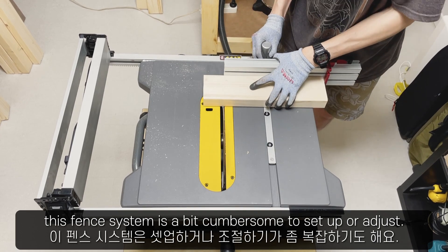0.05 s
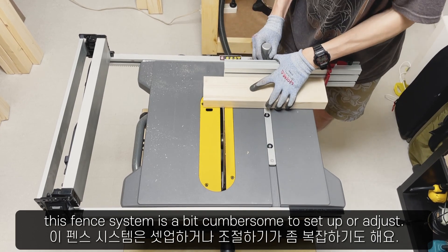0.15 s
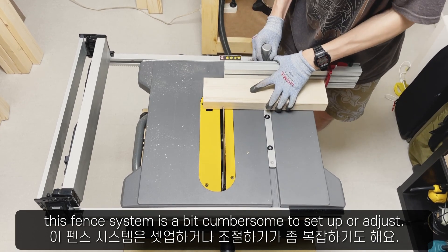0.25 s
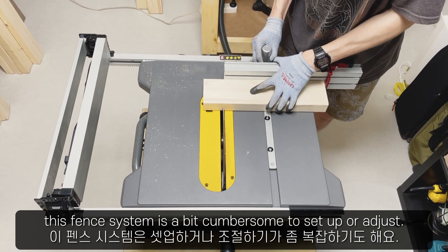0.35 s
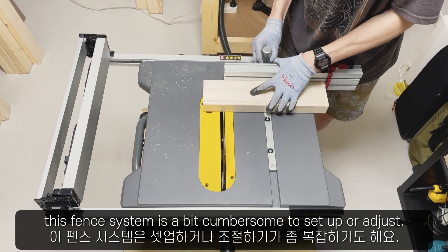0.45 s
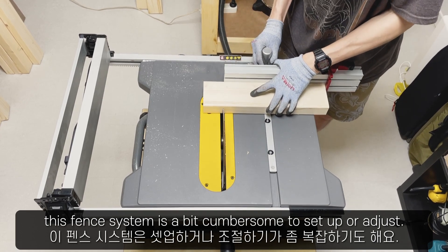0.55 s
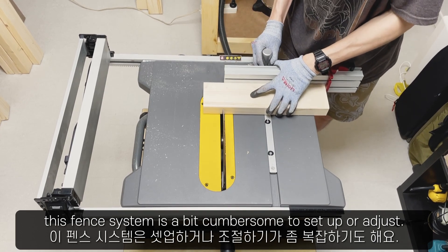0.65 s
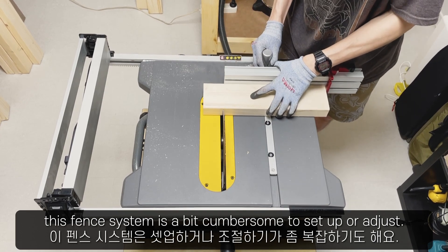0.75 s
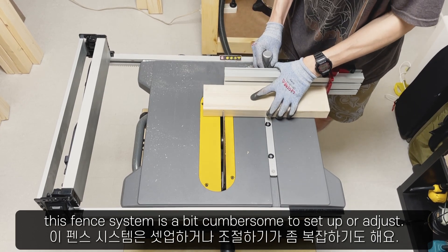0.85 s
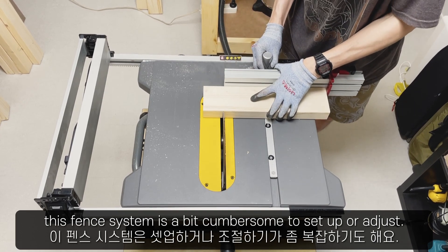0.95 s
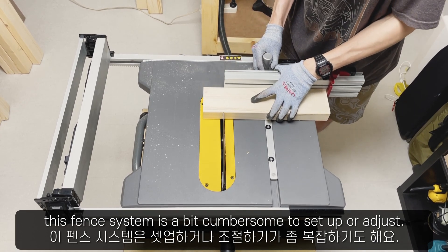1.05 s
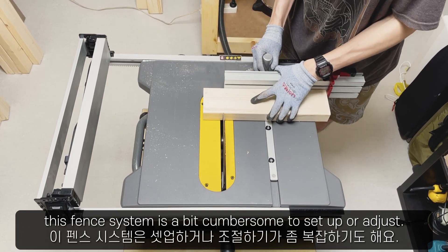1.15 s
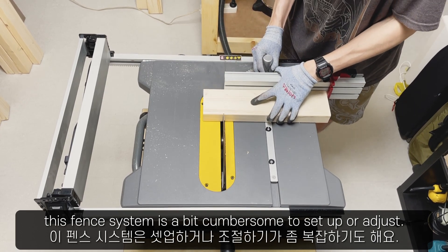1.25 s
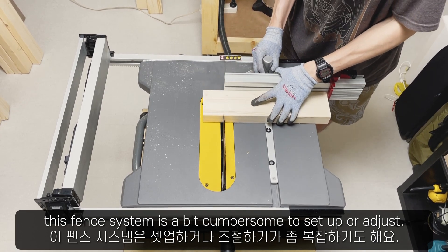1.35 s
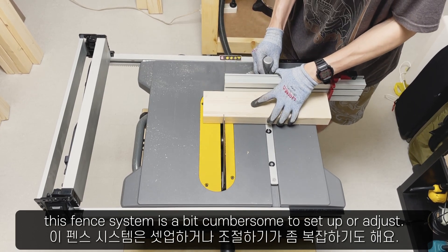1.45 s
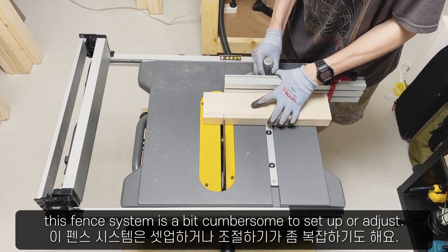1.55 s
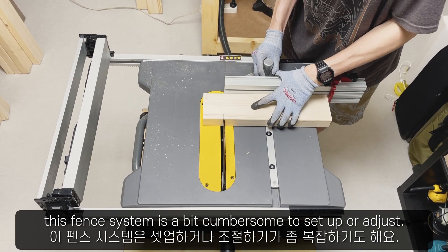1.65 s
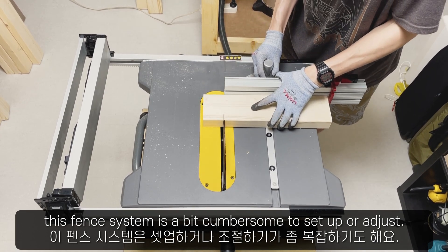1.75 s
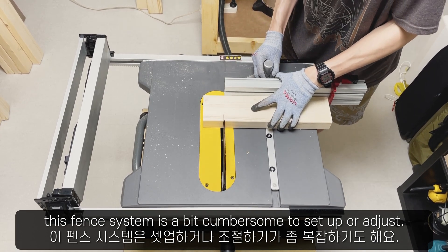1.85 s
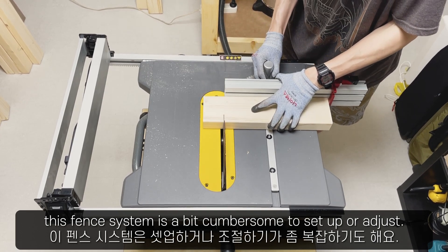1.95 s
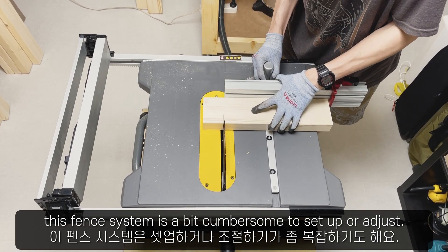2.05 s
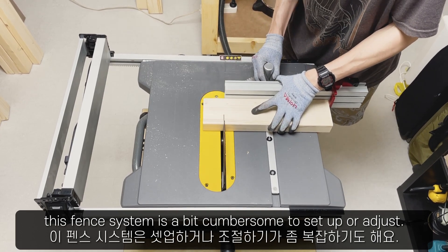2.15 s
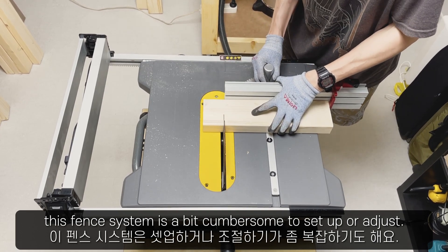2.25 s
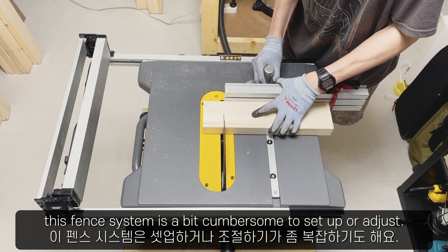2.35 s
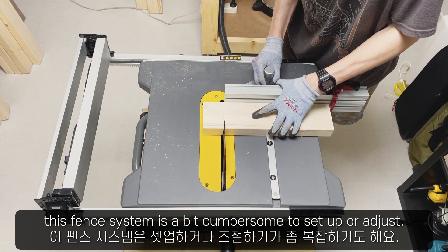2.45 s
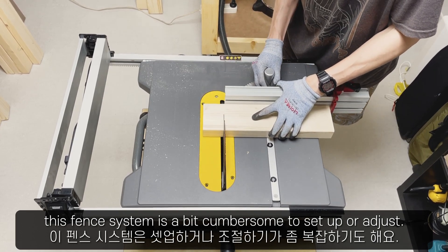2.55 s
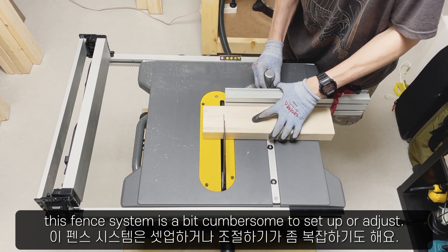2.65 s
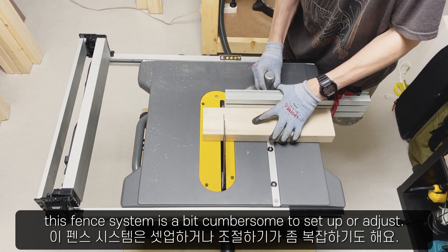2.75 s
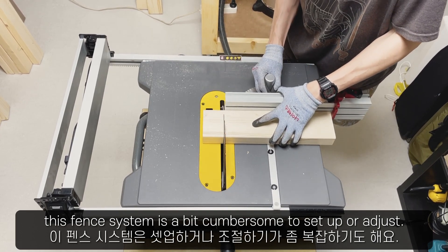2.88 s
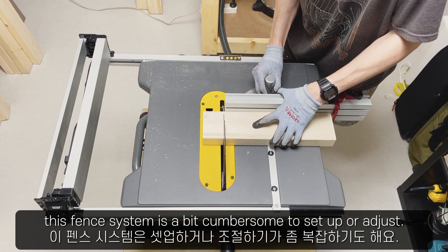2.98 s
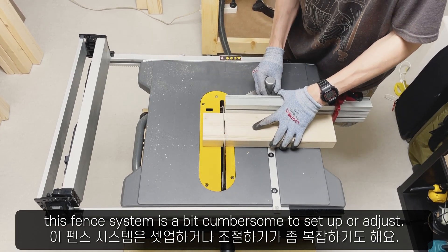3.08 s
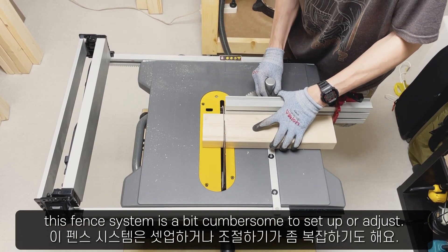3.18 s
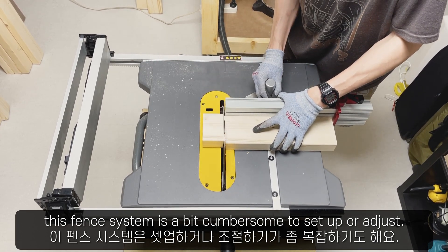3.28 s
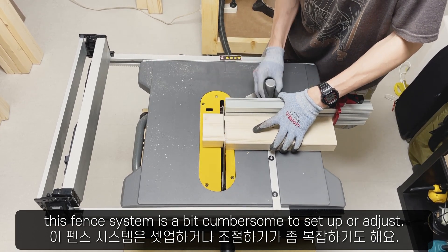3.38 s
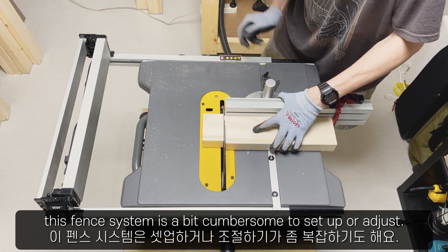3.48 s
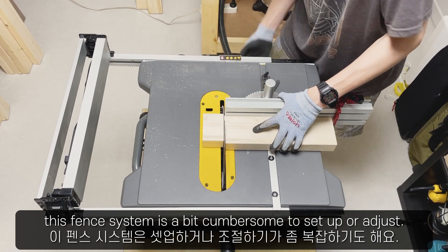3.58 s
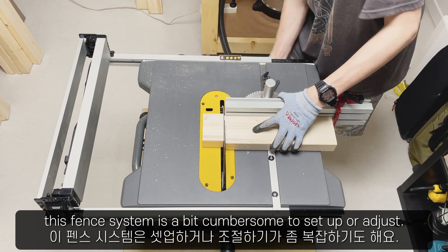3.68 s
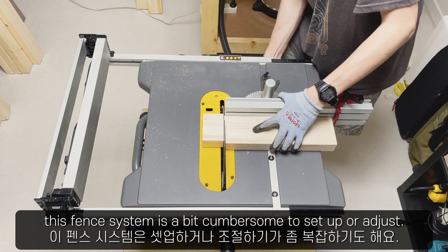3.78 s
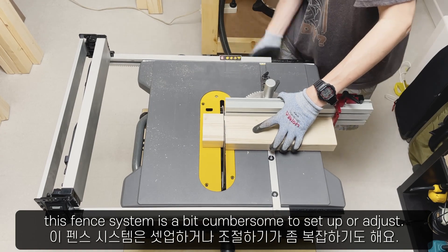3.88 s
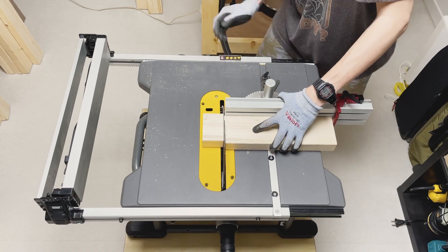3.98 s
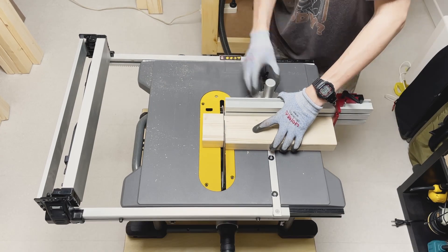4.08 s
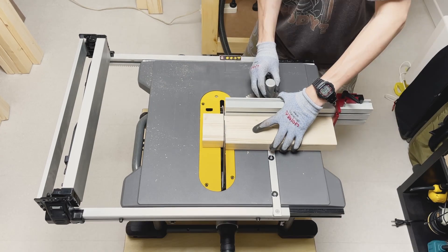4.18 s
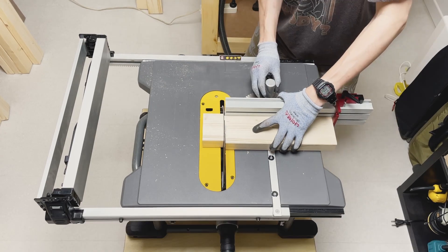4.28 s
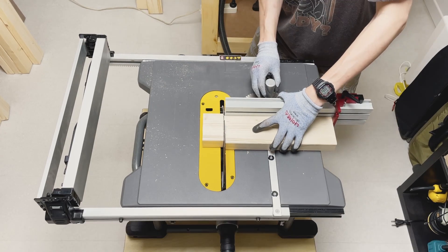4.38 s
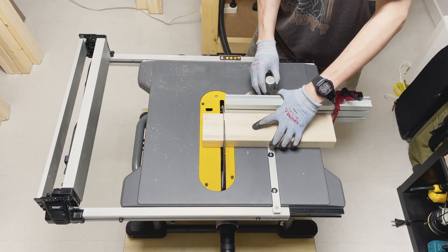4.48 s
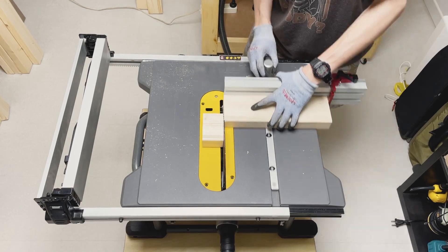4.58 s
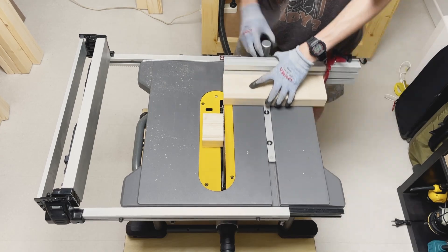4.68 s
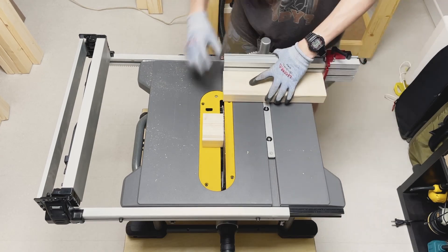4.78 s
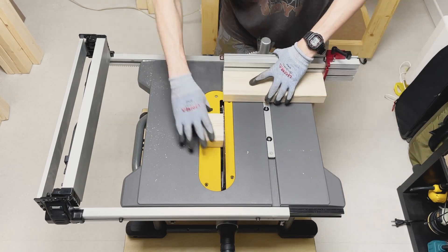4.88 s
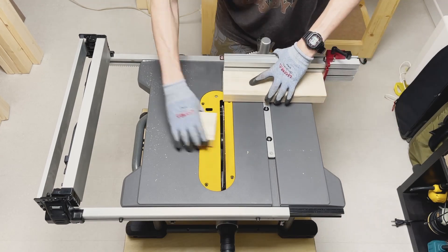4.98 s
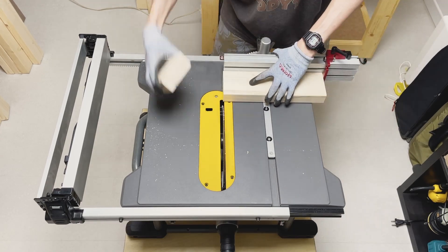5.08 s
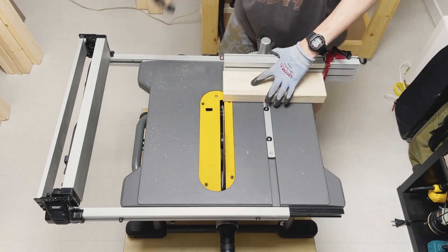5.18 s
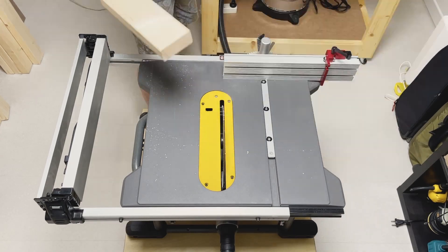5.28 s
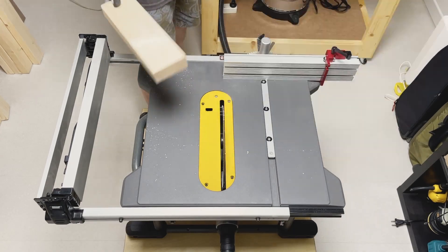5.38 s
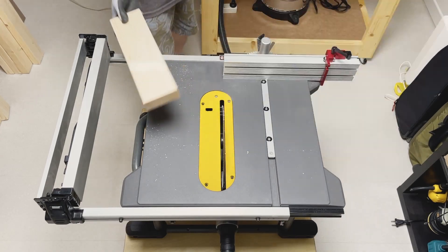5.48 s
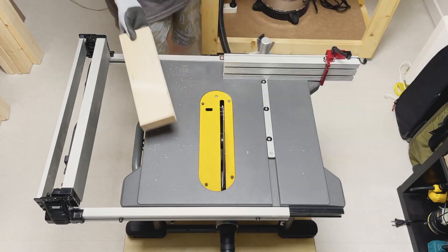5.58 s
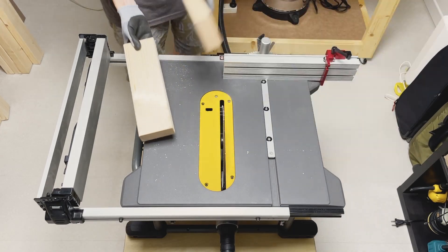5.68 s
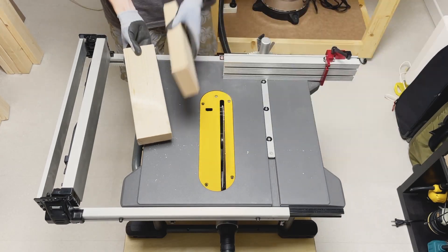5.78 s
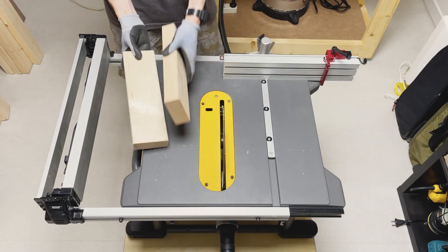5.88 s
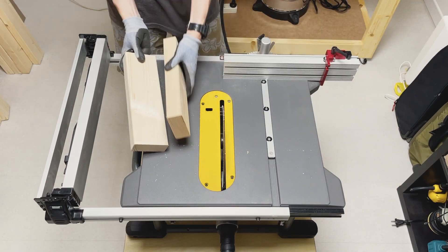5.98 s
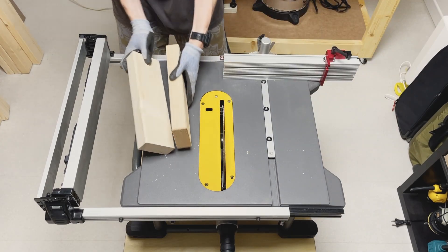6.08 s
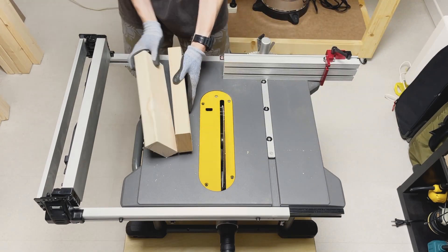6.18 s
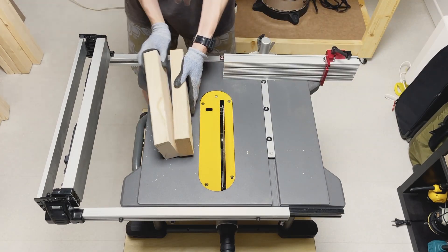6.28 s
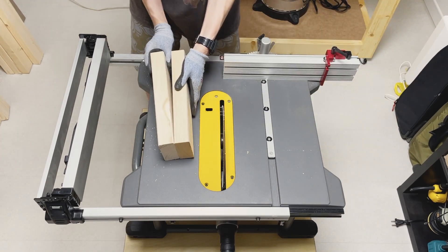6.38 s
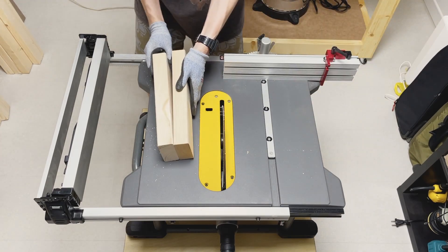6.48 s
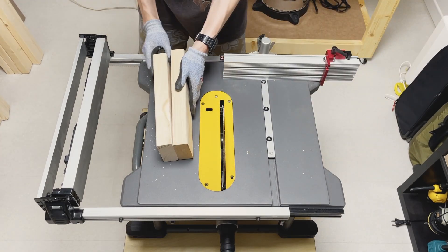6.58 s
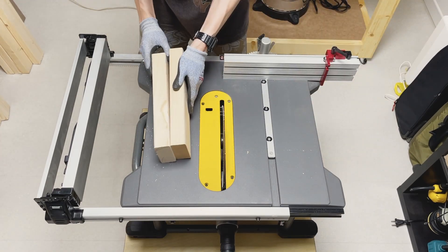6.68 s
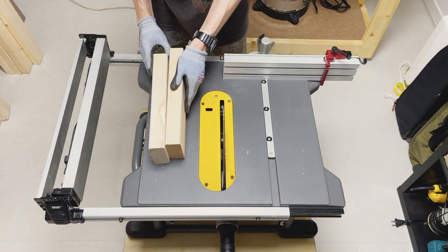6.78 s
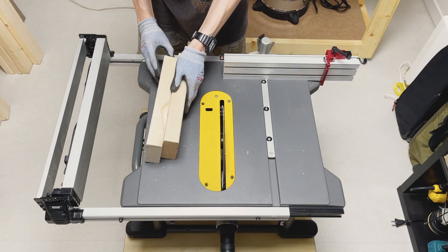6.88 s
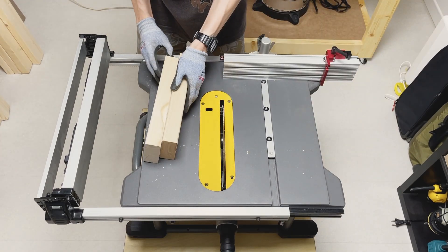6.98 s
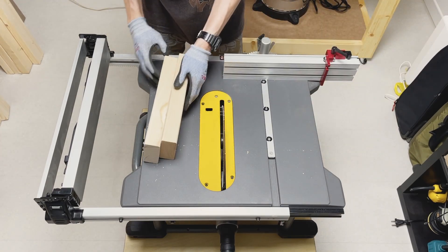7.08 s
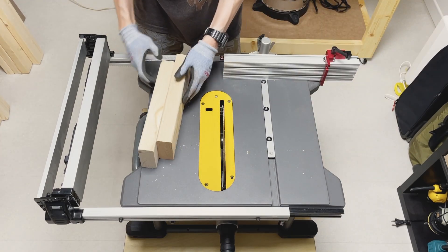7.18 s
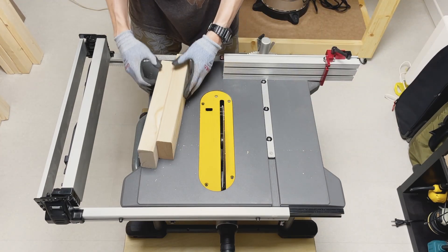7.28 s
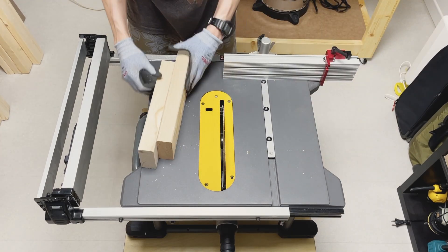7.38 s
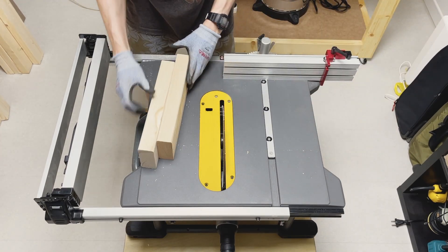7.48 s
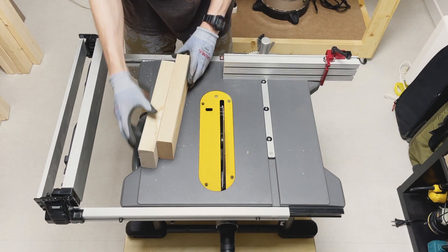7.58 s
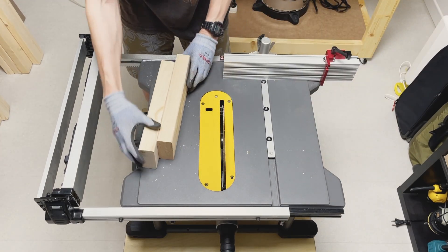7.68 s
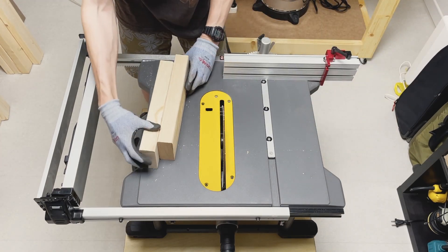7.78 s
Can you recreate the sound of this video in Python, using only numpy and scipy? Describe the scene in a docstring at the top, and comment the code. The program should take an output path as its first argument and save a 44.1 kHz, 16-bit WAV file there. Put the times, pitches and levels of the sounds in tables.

```python
"""A small workshop: a portable table saw crosscuts a board while a dust extractor runs.
Tones locked to the motor and geared blade sag in the cut, recover and are braked to a stop; shaped noise
makes the air and chips. The extractor is a whistle, a hum and hose noise; then the machine sound breaks off.
Gloved hands slide the two pieces over the saw table as grainy noise, one squeaks by stick and slip,
and knocks ring decaying modes, all above a low room rumble."""
import sys
import numpy as np
from scipy import signal
from scipy.fft import rfft, irfft
from scipy.io import wavfile
from scipy.ndimage import map_coordinates

SR = 44100
rng = np.random.default_rng(int(sys.argv[2]) if len(sys.argv) > 2 else 0)


def log_audio(samples):
    """Write samples as a 16-bit WAV file to the path given in sys.argv[1]."""
    # one column per channel
    frames = np.atleast_2d(samples).T
    # limit to full scale, then quantise
    limited = np.clip(frames, -1, 1)
    pcm = np.round(limited * 32767).astype(np.int16)
    wavfile.write(sys.argv[1], SR, pcm)


N = 345744
T = np.arange(N) / SR
HZ = np.fft.rfftfreq(N, 1 / SR)

IDLE_HZ, LOADED_HZ = 400.4, 380.6  # motor shaft, turns per second
GEAR = 8 / 37  # blade turns per motor turn
BRAKE_S, MACHINES_END_S = 3.76, 5.317


def amp(db):
    """Decibels to gain."""
    return np.exp(np.asarray(db) * (np.log(10) / 20))


def unit(x):
    """Scales to rms 1."""
    return x / np.sqrt(np.mean(x ** 2) + 1e-20)


def read(points, hz):
    """Reads a table of frequency and value on a log-frequency axis."""
    f, value = np.transpose(points)
    return np.interp(np.log(hz + 1), np.log(f), value)


def curves(rows):
    """Each column of a table as a curve over time."""
    s, *columns = np.transpose(rows)
    return [np.interp(T, s, c) for c in columns]


def wander(rate_hz):
    """Slow random motion of rms 1, drawn coarsely and interpolated."""
    coarse = N // 8
    hz = HZ[:coarse // 2 + 1]
    lowpass = np.exp(-(hz / rate_hz) ** 2)
    slow = irfft(rfft(rng.standard_normal(coarse)) * lowpass, coarse)
    return unit(np.interp(T, np.linspace(0, T[-1], coarse), slow))


def noise(spectrum, ripple_db=0):
    """Two partly alike noises in dB per Hz; reflections cut a fixed ripple into the spectrum."""
    # Each row: frequency in Hz, left-right coherence from 0 to 1
    likeness = [(130, 0.99), (300, 0.99), (600, 0.99), (1400, 0.7), (3000, 0.94), (6000, 0.51), (14000, 1)]
    a, b = rfft(rng.standard_normal((2, N)))
    same = read(likeness, HZ)
    knots = np.arange(0, SR / 2, 45)
    ripple = np.interp(HZ, knots, rng.standard_normal(len(knots)))
    ripple *= np.minimum(HZ / 1500, 1)  # weaker in the bass
    colour = amp(read(spectrum, HZ) + ripple_db * ripple) * np.sqrt(SR / 2)
    right = same * a + np.sqrt(1 - same ** 2) * b
    return irfft(np.array([a, right]) * colour, N)


def resonate(x, hz, width):
    """A resonance of gain 1: shifted down to 0 Hz, smoothed by one pole and shifted back."""
    turn = np.exp(2j * np.pi * np.cumsum(hz * np.ones(N)) / SR)
    r = np.exp(-np.pi * width / SR)
    return 2 * (turn * signal.lfilter([1 - r], [1, -r], x / turn + 1e-18)).real


def tone(turns, db, flutter=.3, rate_hz=22):
    """A line of about the given rms whose strength and phase flutter in the moving air."""
    knots = rng.standard_normal(size=(2, 4000))
    a, b = (np.interp(T * rate_hz, np.arange(len(k)), k) for k in knots)
    angle = 2 * np.pi * (turns % 1).astype(np.float32)
    line = (1 + flutter * a) * np.sin(angle) + flutter * b * np.cos(angle)
    return np.sqrt(2 / (1 + flutter ** 2)) * amp(db) * line


def room(x):
    """The workshop's tail: sparse taps, each band dying at its own speed, the bass alike in both ears."""
    # Each row: frequency in Hz, time to fall by 60 dB in seconds
    decay_times = [(100, 0.42), (300, 0.23), (700, 0.235), (1500, 0.265), (3500, 0.26), (8000, 0.24),
                   (15000, 0.16)]
    taps = rng.standard_normal((2, SR)) * (rng.random((2, SR)) < .1)
    taps[:, :300] = 0  # a gap before the first reflection
    hz, t, z = signal.stft(taps, SR, nperseg=256)
    same = 1 / (1 + (hz / 550) ** 2)[:, None]
    z[1] = same * z[0] + np.sqrt(1 - same ** 2) * z[1]
    decay = amp(-60 * t / read(decay_times, hz)[:, None])
    tail = signal.istft(z * decay, SR, nperseg=256)[1]
    return signal.fftconvolve(np.atleast_2d(x), tail / np.linalg.norm(tail[0]), axes=1)[:, :N]


def swell(s, rise, fall):
    """Grows to 1 at time s and dies away again."""
    return np.exp(-np.maximum((s - T) / rise, (T - s) / fall))


def flare(s, length):
    """A smooth bump of height 1 around time s."""
    return np.exp(-(2 * (T - s) / length) ** 2)


def envelope(start, attack, hold, release):
    """A straight attack, a hold and a dying release."""
    age = T - start
    return np.clip(age / attack, 0, 1) * np.exp(-np.maximum(age - attack - hold, 0) / release)


def drift(x, db, width_hz, length_s):
    """Narrow bands of a noise swell and fade, each on its own."""
    z = signal.stft(x, nperseg=1024)[2]
    rows, columns = np.indices(z.shape[1:])
    places = [rows * SR / 1024 / width_hz, columns * 512 / SR / length_s]
    patches = map_coordinates(rng.standard_normal((600, 600)), places, order=1, mode="wrap")
    gain = amp(db * unit(patches))
    return signal.istft(z * unit(gain), nperseg=1024)[1][:, :N]


def shaft_speed():
    """The motor sags as the blade enters the board, recovers as it leaves, then is braked to a standstill."""
    # Each row: time in seconds, motor shaft speed in Hz before braking
    speed_points = [(.12, 404.5), (.26, 397.6), (.66, 381.8), (.86, 376.5), (1.06, 374.7), (1.26, 372.2),
                    (1.7, 368.3), (2.06, 368.2), (2.46, 372.8), (3.06, 394.9), (3.26, 398.3), (3.66, 401.2)]
    stopping_s, bend = .77, 1.15  # a bend of 1 is a straight run-down
    stopped = np.clip((T - BRAKE_S) / stopping_s, 0, 1)
    return curves(speed_points)[0] * (1 - stopped ** bend)


def whine_db(hz):
    """A whine swells whenever its pitch crosses a resonance of housing or blade."""
    # Each row: centre in Hz, width in Hz between the points 6 dB down, peak in relative dB
    resonances = [(747, 61, -54.5), (780.8, 15, -50.5), (822, 40, -52.5), (1966, 41, -52.5),
                  (1998, 140, -58.5)]
    floor_db = -80.5  # between the resonances
    grid = np.arange(0, 7000, 2)
    power = amp(floor_db) ** 2
    for centre, width, db in resonances:
        power = power + amp(db) ** 2 / (1 + ((grid - centre) / width * 2) ** 2) ** 2
    return np.interp(hz, grid, 10 * np.log10(power))


def saw_tones(shaft_hz, load):
    """Motor and geared blade sing at multiples of their speeds; the brake sweeps them down."""
    # Weaker steady tones. Each row: multiple of the shaft or blade speed (rounded to a whole number),
    # level idling and level under load in relative dB
    motor_orders = [(4, -74, -63.5), (32, -63, -67.5)]
    blade_orders = [(2, -76, -67.5), (8, -74, -58.5), (22, -62.5, -92), (26, -65, -76), (36, -65, -75),
                    (78.5, -66.5, -58.5), (82, -69.5, -63.5), (142, -67, -61)]
    # Tones that come and go: the gears, the motor's deep whine, its lower singing tone, the teeth's third
    # harmonic, the motor's upper singing tone and shrill whine. Each row: time in seconds, relative dB
    gear_sing = [(.3, -65), (.8, -76), (2.7, -76), (2.9, -61), (3.1, -57), (3.5, -61)]
    deep_sing = [(.3, -74), (.65, -58), (.9, -74), (1.3, -63), (2, -61), (2.5, -66), (2.72, -60), (3, -82)]
    lower_sing = [(.08, -62), (.22, -52), (.32, -46), (.6, -50), (.68, -64), (1.4, -68), (1.7, -56),
                  (2.12, -58), (2.45, -63), (2.64, -58), (3.05, -53), (3.18, -68)]
    tooth_sing = [(.7, -70), (.92, -51), (1.15, -66), (1.3, -57), (1.52, -53), (1.65, -70), (2.2, -70),
                  (2.56, -56), (2.75, -72), (3.3, -61), (3.7, -59)]
    upper_sing = [(.15, -68), (.24, -56), (.41, -49), (.58, -50), (.64, -61), (.8, -53), (.95, -52),
                  (1.12, -56), (1.28, -50), (1.41, -50), (1.55, -66), (1.67, -47), (2.07, -46), (2.15, -56),
                  (2.23, -57), (2.32, -48), (2.47, -51), (2.63, -62), (2.74, -53), (2.92, -52), (3.03, -72),
                  (3.22, -61), (3.55, -68), (3.73, -57)]
    shrill_sing = [(.1, -56), (.35, -58), (.5, -51), (.75, -57), (1, -70), (2.7, -68), (3.05, -59),
                   (3.4, -68)]
    # Hoarse whistle of air between the teeth. Each row: time in seconds, relative dB
    gullet = [(.1, -56), (.5, -66), (1.1, -59), (1.3, -50), (1.9, -56), (2.3, -60), (2.85, -52), (3.1, -56),
              (3.3, -68)]
    # Gear tones while braking. Each row: multiple of the blade speed, relative dB, attack, hold and
    # release in seconds
    brake_tones = [(2, -75, .04, .1, .03), (9, -59.5, 0.14, 0.068, .03), (36, -57.5, 0.28, 0.19, 0.024),
                   (72, -61.5, .06, 0.3, 0.04)]
    teeth = 24
    rough_hz = 6140  # steady tones flutter more the higher they are, fully from here up

    motor = np.cumsum(shaft_hz * (1 + 0.000369 * wander(rate_hz=12.4))) / SR
    blade = motor * GEAR
    out = tone(2 * motor, whine_db(2 * shaft_hz), flutter=0.1)
    tooth_db = whine_db(teeth * GEAR * shaft_hz) + 1.5 * wander(rate_hz=5.2) - 5.5
    out += tone(teeth * blade, tooth_db, flutter=0.2, rate_hz=30)
    singing = ((20 * GEAR, gear_sing), (12, deep_sing), (14, lower_sing),
               (3 * teeth * GEAR, tooth_sing), (16, upper_sing), (35, shrill_sing))
    for order, level in singing:
        out += tone(order * motor, curves(level)[0], flutter=0.22, rate_hz=30)
    for ratio, rows in ((1, motor_orders), (GEAR, blade_orders)):
        for order, idle_db, load_db in rows:
            multiple = round(order) * ratio
            unrest = min(multiple * IDLE_HZ / rough_hz, 1)
            db = idle_db + load * (load_db - idle_db) - 1 + unrest * 3 * wander(rate_hz=4.6)
            out += tone(multiple * motor, db, flutter=0.13 + 0.9 * unrest)
    gullet_db = curves(gullet)[0] + 2 * wander(rate_hz=9)
    out += tone(160 * blade, gullet_db, flutter=1, rate_hz=60)
    out *= np.exp(-np.maximum(T - BRAKE_S, 0) / 0.016)  # these die as soon as the power is off
    for order, db, attack, hold, release in brake_tones:
        radiated = np.minimum(order * GEAR * shaft_hz / 150, 1) ** 4  # the housing radiates little bass
        wavering_db = db + 1.5 * wander(rate_hz=20)
        gear_tone = tone(round(order) * blade, wavering_db, flutter=1.6, rate_hz=4 * order)
        out += radiated * envelope(BRAKE_S, attack, hold, release) * gear_tone
    return amp(5) * out + amp(-22) * room(out)


def squeals(shaft_hz):
    """Blade modes flare up in brief squeals; the gears chirp once before they stand still."""
    # Each row: time in seconds, pitch in Hz, level in dB, length in seconds
    squeal_rows = [(.04, 10560, -52, .16), (.73, 5110, -49, .15), (.78, 5460, -49, .16),
                   (.96, 5425, -56, .3), (.77, 11330, -53, .16), (.76, 11905, -52, .2),
                   (3.16, 13400, -53, .16), (.73, 1975, -47, .25), (2.87, 2015, -48, .2)]
    chirp_s, chirp_db, chirp_length_s = 4.355, -53, .06
    out = sum(tone(hz * T, db, flutter=0.37) * flare(s, length) for s, hz, db, length in squeal_rows)
    gear_turns = 79 * GEAR * np.cumsum(shaft_hz) / SR
    chirp = tone(gear_turns, chirp_db, flutter=3.4, rate_hz=480)
    return out + flare(chirp_s, chirp_length_s) * chirp


def shimmer(speed, load):
    """The teeth keep the blade's high modes shimmering at random; they fade as it slows."""
    # Each row: pitch in Hz, level idling and level under load in dB at idle speed
    blade_modes = [(6440, -62.5, -64.5), (9930, -65, -61), (11400, -56.5, -61.5), (13420, -57.5, -70),
                   (15640, -54.5, -58)]
    out = 0
    for hz, idle_db, load_db in blade_modes:
        db = idle_db + load * (load_db - idle_db) + 3.5 * wander(rate_hz=7.3)
        out = out + tone(hz * T, db, flutter=3, rate_hz=45)
    return speed * out


def blade_air(shaft_hz, speed, unevenness):
    """The running blade drags air along: motor roar under hiss and sizzle at the teeth that waver unevenly."""
    # Level of the dragged air. Each row: time in seconds, relative dB
    air_level = [(0.08, -42), (0.14, -41.5), (0.33, -42.5), (1.01, -45.5), (1.2, -46.5), (2.63, -47),
                 (2.68, -44), (3.48, -46.5), (3.75, -45)]
    # Noise colours. Each row: frequency in Hz, density in relative dB per Hz
    roar_colour = [(30, -51), (70, -26.5), (130, -0.5), (260, 0.5), (400, 2.5), (600, 10), (900, 10),
                   (1250, 6.5), (1900, 8), (2500, 4), (3600, 2), (5000, 3.5), (9000, -15.5)]
    hiss_colour = [(2500, -31.5), (4300, -12.5), (5400, 4.5), (6400, 2), (7500, 4.5), (9000, 1),
                   (11000, 3.5), (13000, -5), (15500, -0.5)]
    sizzle_colour = [(8000, -36.5), (11500, -7), (12900, 2), (14400, -2), (15600, -6), (16400, -26)]
    roar_db, hiss_db, sizzle_db = -3, 5, -1  # relative to the air level
    roar_power, hiss_power = 0.61, 0.87  # they follow the speed by these powers
    stall_hz = 143  # below this shaft speed the air flow collapses
    flow = amp(curves(air_level)[0]) * np.minimum(shaft_hz / stall_hz, 1) ** 1.5
    roar = amp(roar_db) * speed ** roar_power * unit(noise(roar_colour, ripple_db=2))
    hiss = amp(hiss_db) * speed ** hiss_power * unit(noise(hiss_colour, ripple_db=2))
    sizzle = amp(sizzle_db) * unit(noise(sizzle_colour, ripple_db=1.5))
    treble = drift(hiss + sizzle, db=2, width_hz=70, length_s=.16) * unevenness
    return (roar + treble) * flow


def ringing_plate():
    """The blade plate is jolted by the brake, then sings on briefly: noise passed twice through one narrow
    resonance."""
    plate_hz, width_hz, attack_s = 1951, 73, 0.056
    once = resonate(rng.standard_normal(N), plate_hz, width_hz)
    plate = unit(resonate(once, plate_hz, width_hz))
    jolt = amp(-47.5) * envelope(BRAKE_S, attack_s, hold=0, release=0.028)
    sing = amp(-52) * envelope(BRAKE_S, attack_s, hold=0.4, release=0.13)
    return plate * (jolt + sing)


def saw():
    """Adds tones, squeals, shimmer, air and plate; chips spray as noise that grows with the load."""
    # Each row: frequency in Hz, density in dB per Hz at full load
    chip_colour = [(40, -130), (150, -94), (350, -90.5), (520, -75), (700, -83.5), (1050, -81.5),
                   (1500, -99.5), (3000, -105), (5800, -84.5), (12000, -105)]
    shaft_hz = shaft_speed()
    load = np.clip((IDLE_HZ - shaft_hz) / (IDLE_HZ - LOADED_HZ), 0, 1) * (T < BRAKE_S)
    speed = shaft_hz / IDLE_HZ
    blade_turns = np.cumsum(shaft_hz * GEAR) / SR
    # mostly random, with a slight ripple at the blade's turning rate
    unevenness = 1 + 0.017 * np.sin(2 * np.pi * blade_turns) + 0.07 * wander(rate_hz=41)
    air = blade_air(shaft_hz, speed, unevenness)
    chips = np.sqrt(load) * noise(chip_colour) * unevenness
    tones = saw_tones(shaft_hz, load) + squeals(shaft_hz) + shimmer(speed, load)
    return tones + air + chips + ringing_plate()


def extractor():
    """Air rushes and sings through the hose under the turbine's thin whistle and the motor's mains hum."""
    # Turbine. Each row: time in seconds, whistle in Hz, level in dB
    whistle_points = [(0, 8140, -45.5), (.17, 8070, -44), (.3, 7990, -57), (.55, 7990, -56),
                      (.72, 8088, -48.5), (4.3, 8098, -52), (5.32, 8100, -50)]
    # Air in the hose. Each row: time in seconds, gain in dB on the colour below
    rush_level = [(.15, 8), (.6, 2), (2, -0.5), (4.48, 1), (4.65, 4.5)]
    # Each row: frequency in Hz, density in dB per Hz before the rush gain
    rush_colour = [(30, -135), (120, -98), (250, -92), (370, -89), (490, -75.5), (700, -88), (960, -78),
                   (1250, -85), (1650, -90), (1880, -91), (2300, -95.5), (3200, -92.5), (6500, -95),
                   (15300, -100)]
    hz, whistle_db = curves(whistle_points)
    whistle = tone(np.cumsum(hz) / SR, whistle_db, flutter=0.26, rate_hz=39)
    hum = tone(240 * T, -64.5, flutter=0.35, rate_hz=12)
    hose = tone(1922 * T, -68, flutter=3, rate_hz=62)  # one faint, hoarse note
    rush = amp(curves(rush_level)[0]) * noise(rush_colour, ripple_db=2)
    return whistle + hum + hose + rush


def rumble():
    """The room's low rumble grows slowly once the machines are gone; the stand booms after the hardest knock."""
    # Each row: frequency in Hz, density in relative dB per Hz
    rumble_colour = [(20, -36.5), (40, -9), (62, 3), (85, -5.5), (115, -7.5), (160, -20), (300, -24.5),
                     (600, -43), (2000, -55), (8000, -53), (15000, -77.5)]
    boom_colour = [(35, -42.5), (60, -13), (88, 6.5), (120, 4), (200, -20), (500, -56)]
    start_db, growth_db_per_s = -66.5, 6
    level = amp(start_db + growth_db_per_s * (T - MACHINES_END_S))
    boom = amp(-42) * envelope(6.89, attack=0.032, hold=0, release=0.034) * unit(noise(boom_colour))
    return level * unit(noise(rumble_colour)) + boom


def rubbing():
    """Grainy friction rasps and drums on the table, each stroke stirring its own resonance; one piece skids."""
    # Wood and gloves, one row a stroke. Each row: height in seconds, rise and fall in seconds, rasp in
    # relative dB, drumming of the table top in dB, resonance in Hz, its level in dB over the rasp
    strokes = [(5.46, 0.18, .04, -84, -98, 5200, 0), (5.584, 0.016, 0.019, -61.5, -98, 4600, -8),
               (5.71, 0.054, 0.031, -66, -80, 5800, -12), (6.02, 0.071, 0.062, -59.5, -54.5, 600, 0),
               (6.19, 0.053, 0.022, -63, -62, 3300, -11), (6.35, 0.027, 0.13, -61.5, -59.5, 1000, -15),
               (6.521, 0.012, 0.029, -71, -40.5, 520, -0.5), (6.695, 0.024, 0.065, -63, -53, 2700, 1.5),
               (6.71, 0.034, .05, -69.5, -59.5, 760, 12.5), (6.82, 0.04, 0.086, -45.5, -33.5, 1350, -9),
               (7.156, 0.03, 0.015, -51, -48, 820, -2), (7.23, 0.041, 0.12, -84, -55, 700, 0),
               (7.658, 0.017, 0.036, -69.5, -50, 3000, -5), (7.84, 0.059, .05, -66, -53, 1900, -14)]
    # Each row: frequency in Hz, density in relative dB per Hz
    rasp_colour = [(150, 4.5), (520, 6.5), (770, 7.5), (1020, 1.5), (1420, 5.5), (1900, 1.5), (2400, 0.5),
                   (2900, 3.5), (3550, -3.5), (4600, -5), (5600, -8.5), (8000, -14), (10500, -40.5),
                   (15000, -28.5)]
    drum_colour = [(100, -16), (200, -5), (250, -2.5), (278, 9.5), (320, -1.5), (420, -15), (600, -34),
                   (1500, -67.5)]
    scrape_colour = [(400, -30), (1200, 8), (2500, 10), (3600, 1.5), (6000, -1.0), (9000, -14), (12000, -49)]
    half_width = .13  # of a stroke's resonance, as a share of its pitch
    friction = unit(noise(rasp_colour))
    stir = noise([(100, 0), (15000, 0)])
    rasp, drum_gain = 0, 0
    for s, rise, fall, rasp_db, drum_db, ring_hz, ring_db in strokes:
        edges = ring_hz * np.array([1 - half_width, 1 + half_width])
        band = signal.butter(2, edges, "band", fs=SR, output="sos")
        resonance = amp(ring_db) * unit(signal.sosfilt(band, stir))
        stroke = swell(s, rise, fall)
        rasp = rasp + amp(rasp_db) * stroke * (friction + resonance)
        drum_gain = drum_gain + amp(drum_db) * stroke
    grain = unit(amp(2 * wander(rate_hz=400)))  # unevenness of the friction
    rasp = amp(3.5) * grain * drift(rasp, db=2.2, width_hz=220, length_s=.06)
    drum = drum_gain * unit(noise(drum_colour))
    scrape = grain * unit(noise(scrape_colour))
    # one piece skids along the other
    skid = amp(-45.5) * envelope(6.216, attack=0.011, hold=.018, release=0.047) * scrape
    return rasp + drum + skid + amp(-2.5) * room(rasp + skid)


def faint_ring():
    """Light touches stir a faint metallic ring from the saw: noise through two narrow resonances."""
    # Each row: height in seconds, rise and fall in seconds, relative dB
    touches = [(5.46, 0.1, .035, -76), (7.66, 0.014, 0.24, -74)]
    stir = rng.standard_normal(N)
    low, high = (unit(resonate(resonate(stir, hz, 160), hz, 160)) for hz in (1850, 3000))
    both = (low + amp(-12) * high) * unit(amp(3 * wander(rate_hz=25)))
    return sum(amp(db) * swell(s, rise, fall) for s, rise, fall, db in touches) * both


def ring(modes):
    """The sum of an object's dying modes; wood makes soft contact."""
    t = np.arange(SR) / SR
    dying = sum(amp(db - 60 * t / t60) * np.sin(2 * np.pi * hz * t) for hz, db, t60 in modes)
    return dying * (1 - np.exp(-(t / 0.00063) ** 2))


def knocks():
    """Each blow rings the table and the boards; the crack of contact fills the room with a dense thud."""
    # Modes of table, boards and metal table top. Each row: pitch in Hz, relative dB, 60 dB decay in seconds
    table_modes = [(117, -14, 0.36), (233, -14, 0.2), (272, 0, 0.25), (295, -3.5, 0.24), (336, -1, 0.21),
                   (389, -7, .12), (435, -7, 0.13), (596, -6, 0.12)]
    board_modes = [(710, -7.5, .1), (760, -7, 0.07), (920, -14, .06), (985, -9, .06), (1015, -3, 0.06),
                   (1205, -7, 0.05), (1351, -14, 0.07), (1526, -17, 0.07), (1820, -19, .08),
                   (2015, -18, 0.07), (2620, -21, 0.05), (2930, -27, 0.045), (3500, -22, 0.04)]
    top_modes = [(630, -3, .09), (675, -3, .08), (745, -4, .08), (790, -2, .09), (1170, -15, .07),
                 (1830, -16, .12), (1890, -20, .1)]
    # Each row: time in seconds, then table, board, table top and contact crack in relative dB
    blow_rows = [(5.916, -42.5, -53, -37, -48), (5.9201, -35.5, -56, -31, -48), (6.121, -55, -62, -62, -49),
                 (6.218, -61, -68, -68, -47), (6.361, -58, -69, -65, -61), (6.507, -62.5, -80, -66, -69),
                 (6.821, -48.5, -53, -53, -38), (6.8864, -45, -3, -45, -12.5),
                 (6.8913, -17.5, -32, -37.5, -27)]
    # Each row: frequency in Hz, density in relative dB per Hz
    crack_colour = [(30, -46.5), (90, -11), (150, -11), (280, 7.5), (900, 6), (1400, 6.5), (1950, -2.5),
                    (2700, -7.5), (3600, -13), (4500, -16), (8000, -25), (10500, -48), (16000, -59.5)]
    rings = ring(table_modes), ring(board_modes), ring(top_modes)
    blows, crack = np.zeros((len(rings), N)), np.zeros(N)
    for s, table_db, board_db, top_db, crack_db in blow_rows:
        at = round(s * SR)
        blows[:, at] += amp([table_db, board_db, top_db])
        age = T[:N - at]
        crack[at:] += amp(crack_db) * np.exp(-age / 0.0085) * (1 - np.exp(-age / 0.00019))
    body = sum(signal.oaconvolve(b, r)[:N] for b, r in zip(blows, rings))
    crack = crack * unit(noise(crack_colour))
    return body + crack + amp(-12) * room(body) + amp(-2.5) * room(crack)


def squeak():
    """One piece sticks and slips unevenly along the other, squeaking upwards, then again as it settles."""
    # Each row: time in seconds, slips per second, relative dB
    slip_points = [(6.215, 450, -90), (6.22, 480, -53), (6.228, 700, -56), (6.233, 1050, -48),
                   (6.24, 1170, -41), (6.248, 1240, -44), (6.256, 1550, -40), (6.266, 1600, -47),
                   (6.275, 1690, -42), (6.285, 1600, -53), (6.345, 1450, -63), (6.36, 950, -55),
                   (6.385, 650, -62), (6.41, 600, -95)]
    # Each row: multiple of the slip rate, relative dB
    harmonics = [(1, 4), (2, -4), (3, -15)]
    hz, db = curves(slip_points)
    turns = np.cumsum(hz * (1 + .05 * wander(rate_hz=400))) / SR
    slips = unit(sum(amp(part_db) * np.sin(2 * np.pi * round(k) * turns) for k, part_db in harmonics))
    grain = unit(amp(3 * wander(rate_hz=320)))
    sounding = (T > slip_points[0][0]) * (T < slip_points[-1][0])
    out = amp(db) * slips * grain * sounding
    return amp(-0.5) * out + amp(-6) * room(out)  # the room holds each pitch a moment


def scene():
    """The machines first, then the quiet handling of the wood."""
    running = np.clip((MACHINES_END_S - T) / .002 + .5, 0, 1)  # breaks off within 2 ms
    machines = saw() + extractor()
    handling = rumble() + rubbing() + faint_ring() + knocks() + squeak()
    return running * machines + (1 - running) * handling


def record(dry):
    """A low cut; the right port trails in the treble and is a little louder; then the band limit."""
    # Each row: frequency in Hz, lag of the right port in radians
    port_lag = [(1500, 0), (5000, 0.51), (9000, 0.7), (13400, 1.66), (16000, 1.5)]
    low_cut_hz, edge_hz = 38, 15780
    dry = signal.sosfilt(signal.butter(3, low_cut_hz, "high", fs=SR, output="sos"), dry)
    left = amp(-1.83) * np.ones(len(HZ))
    right = amp(-1.6) * np.exp(-1j * read(port_lag, HZ))
    ports = irfft(rfft(dry) * np.array([left, right]), N)
    band_limit = signal.firwin(801, edge_hz, window=("kaiser", 8), fs=SR)
    return signal.oaconvolve(ports, band_limit[None], "same")


dry = scene()
out = record(dry)
log_audio(out)
```